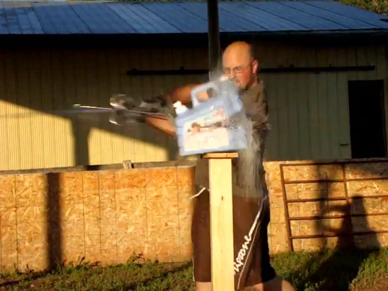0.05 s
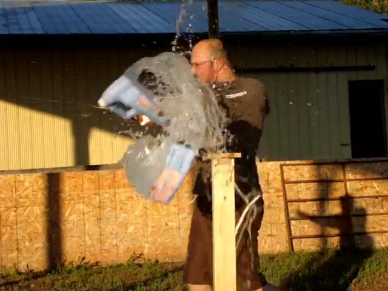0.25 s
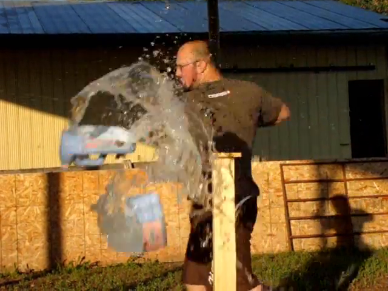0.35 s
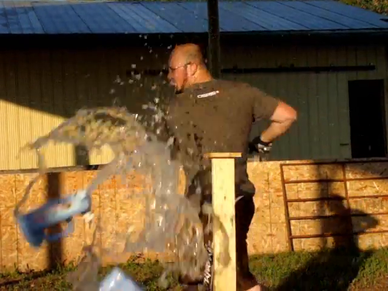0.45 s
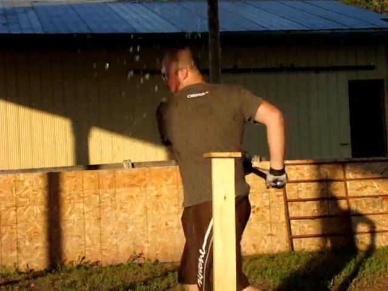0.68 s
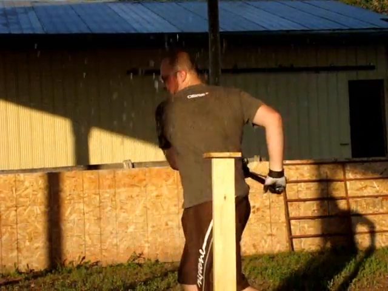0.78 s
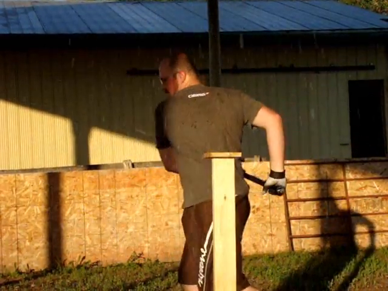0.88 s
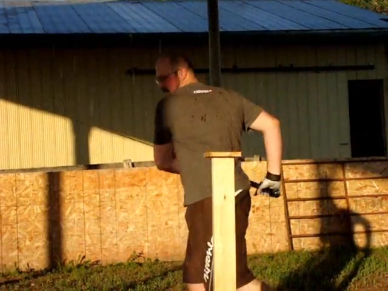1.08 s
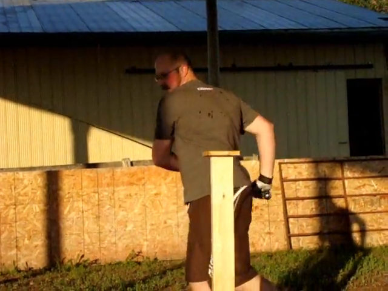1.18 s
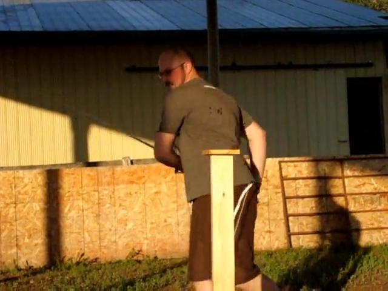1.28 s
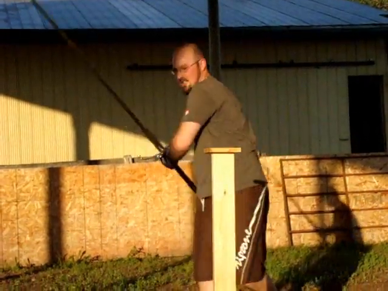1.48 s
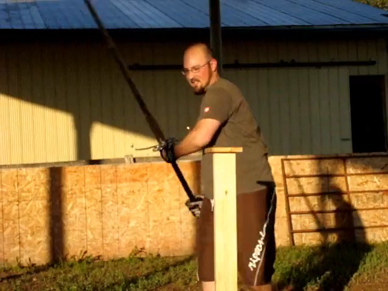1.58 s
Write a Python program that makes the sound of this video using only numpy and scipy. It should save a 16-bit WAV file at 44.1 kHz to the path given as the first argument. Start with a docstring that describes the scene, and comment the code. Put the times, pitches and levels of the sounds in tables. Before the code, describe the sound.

A sword cuts through a water-filled jug outdoors: a quick swish, a loud plastic crack and a wet burst, ringing briefly off a metal shed. Half a second later the pieces land and water spatters onto the ground.

```python
"""In a yard beside a metal shed, a sword swishes through a water-filled plastic jug.
The blow cracks the plastic and the water bursts out; the walls reflect the sound and the shed
rings in its modes. Half a second later the first drops land, the halves thud on the ground,
and the water slaps down, sprays in many small impacts and gurgles away in a resonant hollow."""
import sys
import numpy as np
from scipy import signal
from scipy.fft import rfft, irfft
from scipy.io import wavfile

SR = 44100
rng = np.random.default_rng(int(sys.argv[2]) if len(sys.argv) > 2 else 0)


def master(y):
    """Save y as 16-bit WAV."""
    cut = np.clip(np.atleast_2d(y).T, -1, 1)
    pcm = np.round(cut * 32767)  # scale
    wavfile.write(sys.argv[1], SR, pcm.astype(np.int16))


N = 72765
T = np.arange(N) / SR


def blade():
    """Turbulence and impact: the blade swishes, bites, cracks the plastic and pushes air aside."""
    # blade and water strike the jug's walls: t/s, peak level/dB, f/Hz
    cracks = [(0.2232, 0, 3360), (0.2243, 1.5, 1720), (0.2271, -4, 1180), (0.2306, 0.5, 1110),
              (0.2384, 3.5, 950), (0.2408, 1.5, 1210)]
    # spectrum of the displaced air: f/Hz, relative level/dB
    push_spectrum = [(25, -4.5), (60, -8), (150, -1), (300, -8), (1000, -33)]
    swish = amp(-35) * band(noise(), hz=2920, octaves=0.66) * envelope(0.202, 0.0061, 0.032, 0.026)
    bite = amp(-21.5) * band(noise(), hz=6000, octaves=0.51) * envelope(.2226, 0.00082, 0.0018, 0.014)
    push_level = envelope(0.229, .006, 0.021, .06) + amp(-16) * envelope(0.194, .02, 0.078, 1.1)
    push = amp(-38) * colour(noise(), push_spectrum) * push_level
    return swish + bite + push + low_cut(pops(cracks, rise_cycles=0.29, fall_cycles=0.52), hz=278)


def pops(blows, rise_cycles, fall_cycles):
    """Damped vibration: each blow flexes the plastic for a cycle or two."""
    out = np.zeros(N)
    for s, db, hz in blows:
        cycles = (T - s) * hz
        decay = np.exp(-abs(cycles) / np.where(cycles < 0, rise_cycles, fall_cycles))
        out -= amp(db) * np.cos(2 * np.pi * cycles) * decay
    return out


def burst():
    """Rupture: tearing plastic and escaping water emit a dense crackle of impulses."""
    # spectrum of the rupture: f/Hz, relative level/dB
    spectrum = [(30, -38), (190, -20), (235, -10), (268, 0.5), (550, -3.5), (1100, 2), (1550, -3),
                (2100, -4), (3300, -9.5), (6000, -14.5), (9500, -25.5), (12000, -30.5), (15000, -25)]
    tearing = patter(per_s=3000, spread_db=2.5, wash=0.61)
    water = droplets(per_s=500, spread_db=2.5, octaves=0.35)
    return amp(-12) * colour(tearing + water, spectrum) * envelope(.223, 0.0027, 0.07, 0.31)


def landing():
    """Impact excitation: the halves thud and tumble as the bulk of the water slaps down."""
    # modes of the water-laden halves: f/Hz, relative level/dB, T60/s
    modes = [(162, -7, 0.27), (203, 0, .13), (236, 6, .1), (284, -6, 0.25)]
    # spectrum of the slap: f/Hz, relative level/dB
    spectrum = [(30, -44), (110, -23), (170, -4.5), (280, 3), (380, -1.5), (660, 2.5), (1200, 1),
                (2400, -1.5), (5000, -12), (10000, -19), (15000, -32)]
    # the halves strike the ground and settle: t/s, peak level/dB, f/Hz
    blows = [(0.7926, -5.5, 690), (0.8115, -3.5, 790), (0.8213, -3, 800), (0.8262, -6, 640),
             (0.8445, -12, 700), (0.859, -4, 850), (1.2815, -15, 834), (1.505, -18.5, 940)]
    land_s = .7915
    thud = sum(amp(db) * np.sin(2 * np.pi * f * (T - land_s)) * envelope(land_s, 0.0062, 0.0044, t60)
               for f, db, t60 in modes)
    slap = colour(patter(per_s=1600, spread_db=2.5, wash=0.7), spectrum)
    slap *= amp(-16) * envelope(land_s, 0.0015, 0.01, 0.048) + amp(-17) * envelope(.807, .005, 0.022, 0.85)
    knocks = pops(blows, rise_cycles=0.69, fall_cycles=0.48)
    return low_cut(amp(-23) * thud, hz=130) + slap + low_cut(knocks, hz=298)


def spray():
    """Superposition of random impacts: the thrown water rains down in fine drops and fat ones."""
    # spectrum of the fine drops: f/Hz, relative level/dB
    spectrum = [(40, -24), (120, -18.5), (300, -4), (700, 3.5), (1500, -1), (3000, 0), (6000, -4.5),
                (9600, -12), (10400, -23), (12000, -21.5), (15000, -18)]
    # their swell and fade: t/s, level/dB
    levels = [(.54, -49), (.6, -41.5), (.7, -47), (.78, -35), (.81, -30.5), (.89, -17.5), (1.0, -19),
              (1.1, -24.5), (1.22, -32), (1.33, -32), (1.45, -35.5), (1.65, -46.5)]
    clicks = patter(per_s=4500, spread_db=2, wash=.5)
    pitched = amp(1) * droplets(per_s=800, spread_db=2, octaves=.22)
    fine = colour(clicks + pitched, spectrum) * amp(curve(levels))
    fat = band(droplets(per_s=60, spread_db=1.5, octaves=.5), hz=4000, octaves=.9)
    return fine + amp(-34.5) * fat * envelope(.8, .1, 0.14, 1.35)


def drops():
    """Brief impacts have broad spectra: each single drop lands with a splat and a bright tick."""
    # drops before and after the main splash: t/s, level/dB, f/Hz
    impacts = [(0.608, -31, 3130), (0.637, -32.5, 3400), (0.672, -35.5, 5400), (0.7207, -31, 4000),
               (0.74, -29, 3840), (0.749, -20.5, 2200), (0.767, -27.5, 3970), (0.784, -27, 2290),
               (1.065, -27.5, 4900), (1.282, -26, 2330), (1.297, -30, 3170), (1.333, -27, 2340),
               (1.357, -30, 3300), (1.444, -35, 3500), (1.64, -37.5, 5200)]
    splat_decay_s, tick_decay_s = 0.0039, 0.0017
    out = np.zeros(N)
    for s, db, hz in impacts:
        splat = band(noise(), hz, octaves=.8) * np.exp(-abs(T - s) / splat_decay_s)
        tick = band(noise(), hz=6800, octaves=0.43) * np.exp(-abs(T - s) / tick_decay_s)
        out += amp(db) * (T >= s) * (splat + amp(-11) * tick)
    return out


def gurgle():
    """Cavity resonance: water drums in a hollow whose pitch rises as it drains."""
    # lowest resonance of the hollow: t/s, f/Hz, level/dB
    track = [(.9, 610, -61), (1.03, 700, -27.5), (1.15, 745, -29), (1.236, 810, -30), (1.32, 780, -34),
             (1.38, 920, -31.5), (1.43, 876, -39), (1.51, 930, -36.5), (1.65, 930, -53)]
    s, hz, db = np.transpose(track)
    pitch = np.interp(T, s, hz)
    drive = patter(per_s=1100, spread_db=0.5, wash=0.7)
    body = low_cut(resonate(drive, pitch, width_hz=510), hz=396) * amp(np.interp(T, s, db))
    second = amp(-43) * resonate(drive, pitch * 1.43, width_hz=210)
    third = amp(-42.5) * resonate(drive, pitch * 2.85, width_hz=380)
    return body + low_cut(second + third, hz=704) * envelope(1.223, 0.048, 0.34, 0.67)


def yard_echo():
    """Reverberation: dense reflections follow the burst, the bass lasting longest."""
    # spectrum of the reflections: f/Hz, relative level/dB
    spectrum = [(60, -37), (170, -26.5), (232, -15), (268, -9), (380, -1.5), (500, 1), (1000, 2.5),
                (1400, -4), (2100, -5), (4500, -12), (9000, -27), (12000, -30), (15000, -29)]
    # reverberation time of the yard: f/Hz, T60/s
    decay_times = [(250, 1.55), (550, 1.2), (1000, 0.83), (2000, 0.82), (5000, 0.67), (14000, 0.93)]
    start_s, rise_s, decay_from_s = 0.277, 0.05, .33
    reflections = colour(patter(per_s=2500, spread_db=2.5, wash=.9), spectrum)
    hz, t, frames = signal.stft(reflections, SR, nperseg=256)
    decay = np.exp(-np.log(1000) * np.maximum(t - decay_from_s, 0) / read(decay_times, hz)[:, None])
    onset = np.clip((T - start_s) / rise_s, 0, 1)
    return amp(-14) * signal.istft(frames * decay, SR)[1][:N] * onset


def shed():
    """Sympathetic vibration: the metal wall answers the burst, each mode wavering in phase."""
    # modes of the wall: f/Hz, relative level/dB, T60/s
    modes = [(280.3, -9, 0.92), (435, -10, 1.9), (498, -8, 1.6), (559.6, 0.5, 0.84), (722, -13, 0.652),
             (794, -21, 0.67), (897, -1, 0.51), (947, 3, 0.52), (1148, -5, 0.81), (1303, -4, 0.39),
             (1687, -12, 0.42), (1920, -5, 0.49), (1970, -4.5, .55)]
    ring = np.zeros(N)
    for f, db, t60 in modes:
        turns = f * T + rng.random() + .1 * band(noise(), hz=12, octaves=0.62)
        ring += amp(db) * np.sin(2 * np.pi * turns) * envelope(0.281, 0.022, 0.032, t60)
    return amp(-20.5) * ring


def water_wash():
    """Shot noise: a faint hollow wash of water dies away like a splash's tail, then lingers low."""
    # spectrum of the wash of water: f/Hz, relative level/dB
    spectrum = [(25, -25), (100, -19), (220, -9), (480, 0.5), (700, 2), (1000, 3), (1400, -5), (3500, -12),
                (7000, -22.5), (12000, -30.5), (15000, -29)]
    # it dies away at first, then lingers: t/s, level/dB
    levels = [(0, -35.5), (.18, -41.5), (1.65, -39.5)]
    return colour(patter(per_s=1600, spread_db=2, wash=1), spectrum) * amp(curve(levels))


def patter(per_s, spread_db, wash):
    """Shot noise: random clicks of uneven size over a smooth wash; rms 1."""
    size = amp(spread_db * np.minimum(rng.exponential(1, N), 4))
    clicks = size * np.sign(noise()) * (rng.random(N) < per_s / SR)
    return unit(unit(clicks) + wash * noise())


def droplets(per_s, spread_db, octaves):
    """Band-limited shot noise: drops at 14 pitches, per_s at each; rms 1."""
    return unit(sum(np.sqrt(hz) * band(patter(per_s, spread_db, 0), hz, octaves)
                    for hz in np.geomspace(400, 15000, 14)))


def noise():
    """White Gaussian noise."""
    return rng.standard_normal(N)


def colour(x, spectrum):
    """Minimum-phase filtering to the given spectrum; rms 1."""
    log_gain = np.log(amp(read(spectrum, abs(np.fft.fftfreq(4096, 1 / SR)))))
    taps = np.fft.ifft(np.exp(np.conj(signal.hilbert(log_gain)))).real
    return unit(signal.fftconvolve(x, taps[:len(taps) // 2])[:N])


def band(x, hz, octaves):
    """Gaussian band-pass on a log-frequency axis; rms 1."""
    f = np.fft.rfftfreq(N, 1 / SR) + 1
    return unit(irfft(rfft(x) * np.exp(-.5 * (np.log2(f / hz) / octaves) ** 2), N))


def resonate(x, hz, width_hz):
    """Double-pole resonance that follows the curve hz; rms 1."""
    carrier = np.exp(2j * np.pi * np.cumsum(hz) / SR)
    pole = np.exp(-np.pi * width_hz / SR)
    return unit((carrier * signal.lfilter([1], [1, -2 * pole, pole * pole], x / carrier)).real)


def low_cut(x, hz):
    """Third-order high-pass."""
    return signal.sosfilt(signal.butter(3, hz, "high", fs=SR, output="sos"), x)


def envelope(start_s, rise_s, hold_s, t60):
    """Linear attack; exponential decay from hold_s after the start."""
    attack = np.clip((T - start_s) / rise_s, 0, 1)
    return attack * np.exp(-np.log(1000) * np.maximum(T - start_s - hold_s, 0) / t60)


def curve(points):
    """Linear interpolation in time."""
    return np.interp(T, *np.transpose(points))


def read(points, hz):
    """Interpolation in log frequency."""
    f, value = np.transpose(points)
    return np.interp(np.log(hz + 1), np.log(f), value)


def amp(db):
    """Decibels to amplitude ratio."""
    return 10 ** (np.asarray(db) / 20)


def unit(x):
    """Normalisation to rms 1."""
    return x / np.sqrt(np.mean(x ** 2) + 1e-20)


def scene():
    """Superposition of the cut, its echo and everything coming down, in mono."""
    cut = blade() + burst() + yard_echo() + shed()
    return (cut + drops() + landing() + spray() + gurgle() + water_wash())[None]


def record(dry):
    """Hard clipping of the loudest peaks, then a low-pass at 16.1 kHz."""
    clipped = np.clip(dry, -1.1, 1.1)
    low_pass = signal.firwin(511, 16100, window=("kaiser", 9), fs=SR)
    return signal.oaconvolve(clipped, low_pass[None], "same")


dry = scene()
out = record(dry)
master(out)
```